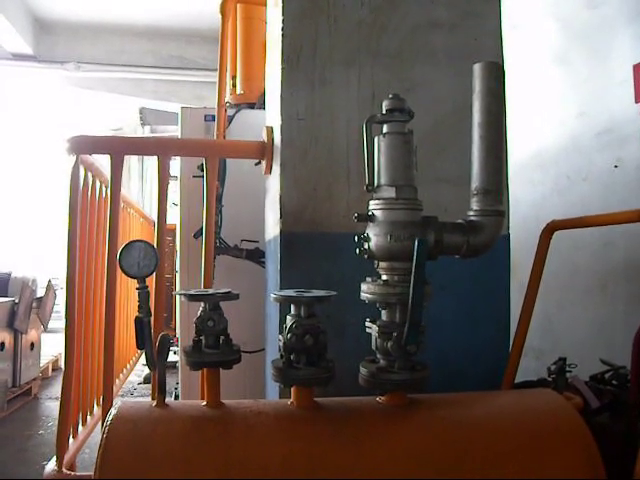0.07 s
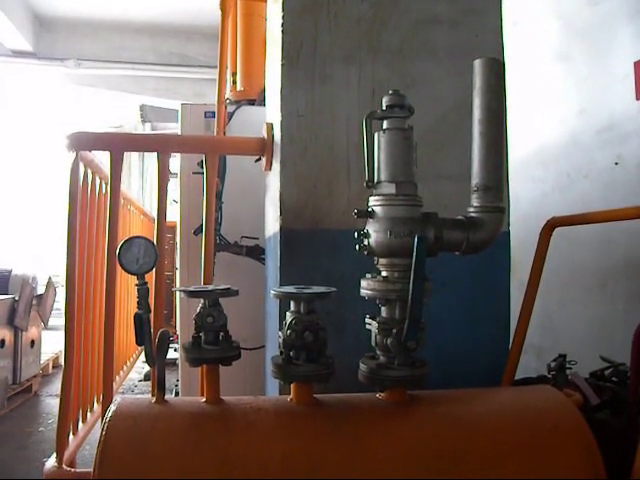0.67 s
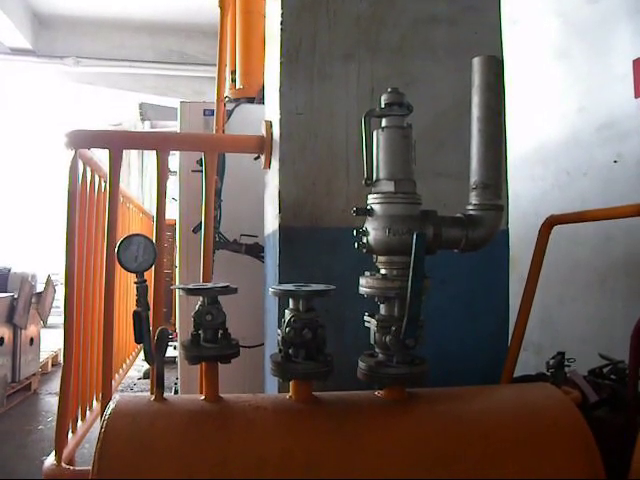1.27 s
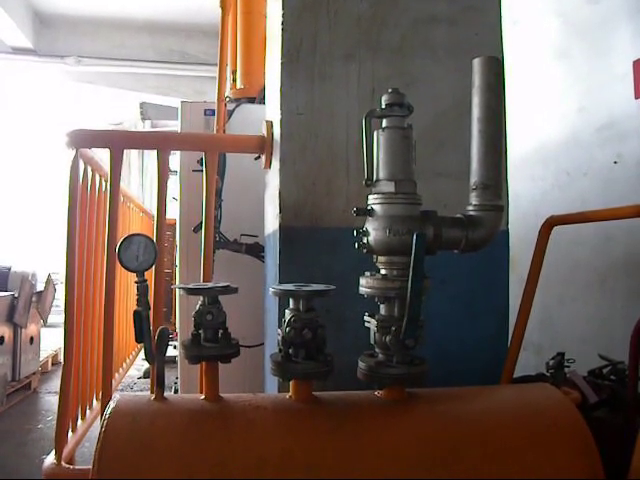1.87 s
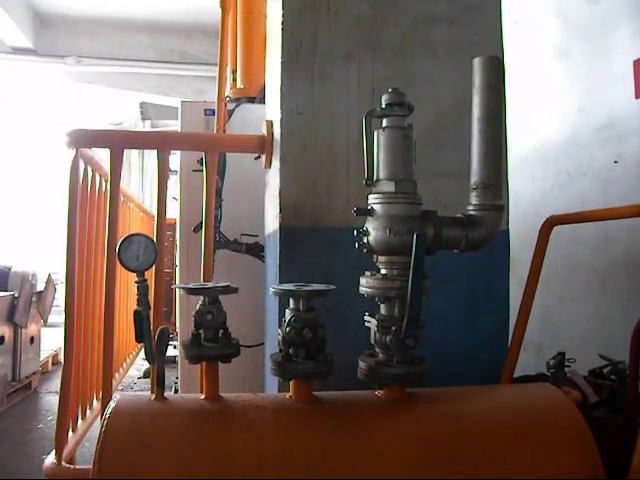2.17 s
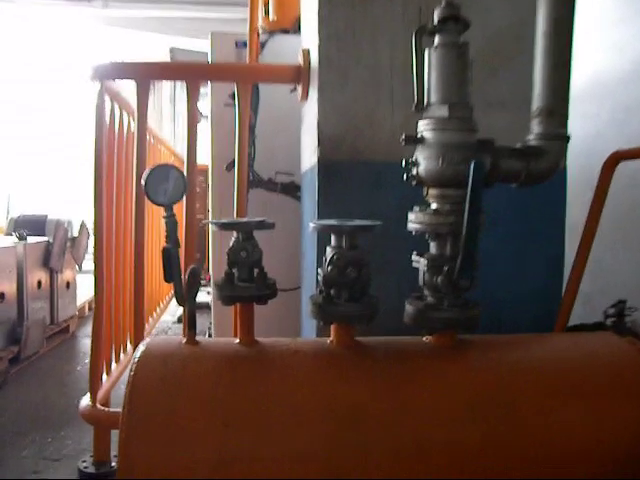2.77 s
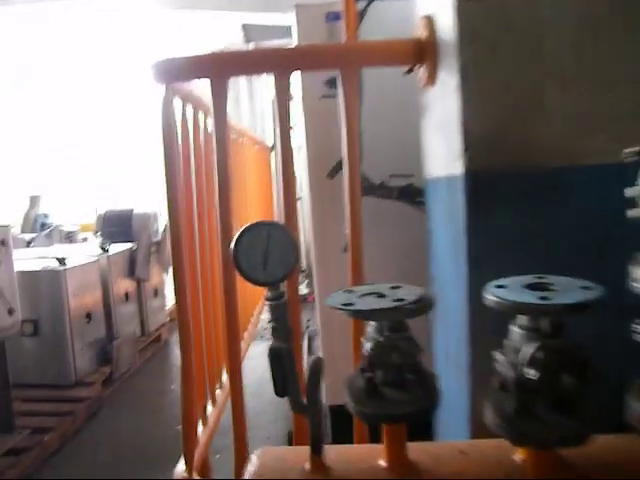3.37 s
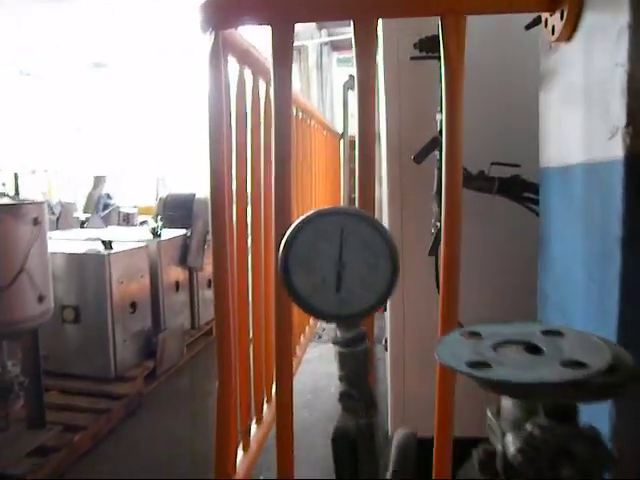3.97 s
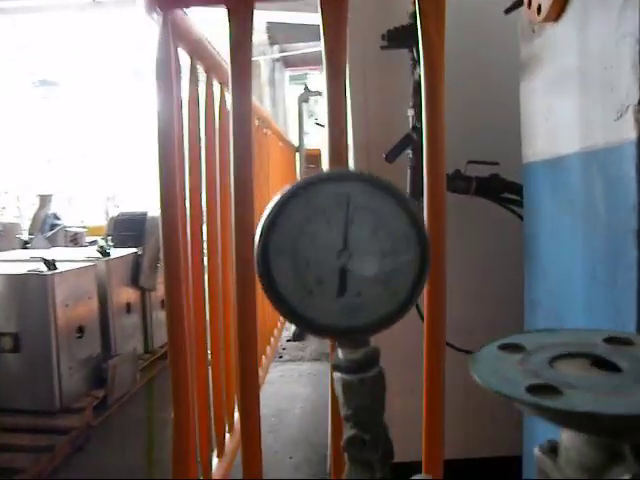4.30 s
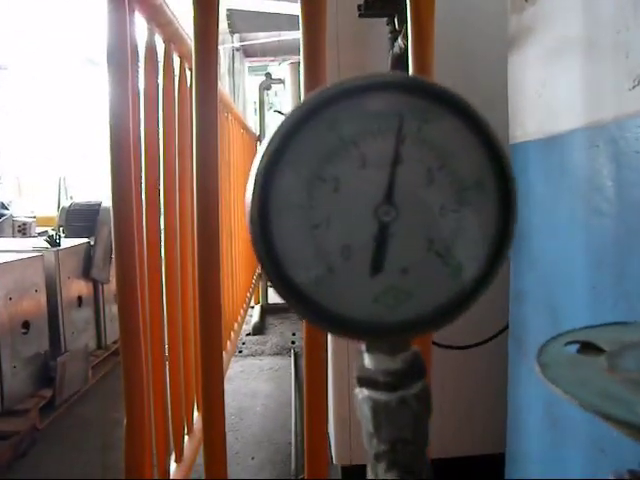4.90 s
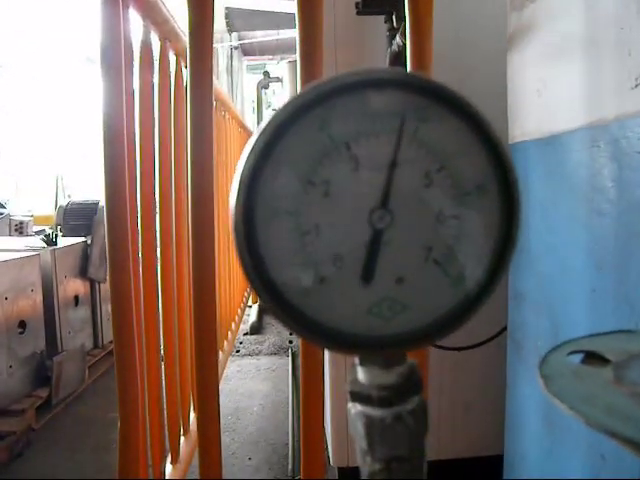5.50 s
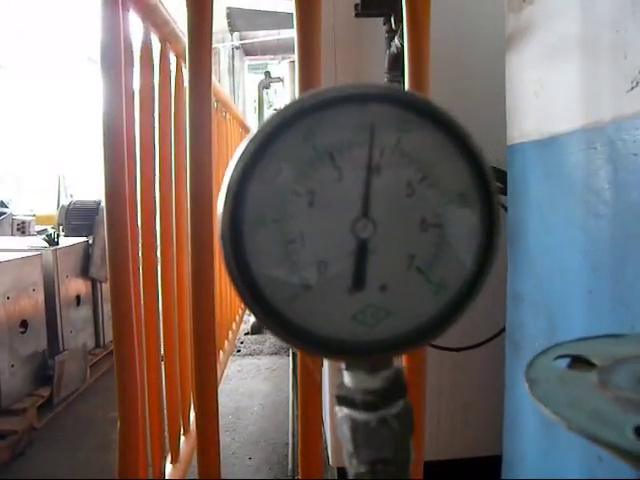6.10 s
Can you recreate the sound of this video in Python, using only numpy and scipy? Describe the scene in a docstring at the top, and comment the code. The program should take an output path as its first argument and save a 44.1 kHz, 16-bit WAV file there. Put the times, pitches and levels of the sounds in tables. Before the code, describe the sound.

A fading air blast gives way to the steady singing hiss of compressed air in factory pipes. Three times a valve clanks open and vents a jet of air that dies away over a low exhaust drone. Machines hum faintly behind, and the pipe notes shift midway as the microphone moves. The small camera microphone has a telephone-like tone, dips in volume at each bang and adds a few tiny clicks.

```python
"""Compressed air sings through steel pipes in a factory hall, over faint machine tones and rumble.
About every two seconds a valve knocks, bangs open and blows off air through a droning exhaust pipe.
The pipe notes shift when the valve first switches over, and later as a small camera's microphone
moves from the tank to the pressure gauge. The camera sounds like a telephone, adds faint hiss
and ticks, and turns itself down at each loud bang."""
import sys
import numpy as np
from scipy import signal
from scipy.fft import rfft, irfft, next_fast_len
from scipy.io import wavfile
from scipy.ndimage import uniform_filter1d, map_coordinates

SR = 44100
rng = np.random.default_rng(int(sys.argv[2]) if len(sys.argv) > 2 else 0)


def store_pcm(level_fs):
    """Save levels as 16-bit WAV."""
    pcm = np.round(np.clip(level_fs, -1, 1) * 32767).astype(np.int16)
    wavfile.write(sys.argv[1], SR, np.atleast_2d(pcm).T)


N = 275625
BAND_HZ = 4080  # the microphone loses sound above this

# Which pipe sound is heard; in-between values mix two:
# (time [s], stage [0 tank, 1 tank after the valve switches over, 2 handwheels, 3 gauge])
STAGES = [(1.7, 0.5), (2.2, 0.75), (3.2, 1), (3.55, 2), (3.9, 2), (4.55, 3)]
# Blow-offs: (time [s], jet level [dB], drone level [dB], drone rise [s], ring pitch [Hz], ring level [dB])
BLOW_OFFS = [(-.4, -12, -27.5, 0.8, 440, -23), (1.69, -9.5, -27.5, 0.39, 445, -24.5),
             (3.789, -8, -23.5, .03, 383, -29.5), (5.86, -14, -27, 0.019, 388, -26.5)]


def amp(db):
    """Turn decibels into a multiplier."""
    return 10 ** (np.asarray(db) / 20)


def unit(x):
    """Scale x to an average (rms) level of 1."""
    return x / np.sqrt(np.mean(x ** 2) + 1e-20)


def clock():
    """The time of each sample in seconds."""
    return np.arange(N) / SR


def curve(rows):
    """Join (time, value) rows with straight lines."""
    return np.interp(clock(), *np.transpose(rows))


def colour(points, hz):
    """The multiplier at hz, read between (Hz, dB) points."""
    point_hz, db = np.transpose(points)
    return amp(np.interp(np.log(hz + 1), np.log(point_hz + 1), db))


def filtered(x, response):
    """Multiply each frequency in x by response(hz)."""
    size = next_fast_len(len(x) + 8192, real=True)
    return irfft(rfft(x, size) * response(np.fft.rfftfreq(size, 1 / SR)), size)[:len(x)]


def noise(response, size=N):
    """Fresh noise shaped by response, at level 1."""
    return unit(filtered(rng.standard_normal(size), response))


def resonance(hz, centre_hz, width_hz):
    """A peak that favours frequencies near centre_hz."""
    return 1 / (1 + ((hz - centre_hz) / width_hz) ** 2)


def wobble(rate):
    """A smooth curve through rate random values a second."""
    knots = rng.standard_normal(int(N * rate / SR) + 4)
    steps = np.arange(0, len(knots), 1 / 10)
    return np.interp(clock() * rate, steps, map_coordinates(knots, [steps]))


def swell(age, rise_s, fade_db_per_s):
    """A loudness shape that rises from silence and fades."""
    age = np.maximum(age, 0)
    return np.sin(np.pi / 2 * np.minimum(age / rise_s, 1)) ** 2 * amp(-fade_db_per_s * age)


def pipe(modes, rush_shape, width_hz, ring_db, rush_db):
    """Swirling air makes a pipe ring at its own notes (modes) over a broad rush."""
    grid = np.arange(2 * BAND_HZ)
    widths = [width_hz * np.sqrt(hz / BAND_HZ) for hz, db in modes]
    power = sum((amp(db) * resonance(grid, hz, w)) ** 2 / w for (hz, db), w in zip(modes, widths))
    ring = noise(lambda hz: np.interp(hz, grid, np.sqrt(power), right=0))
    steadiness = 0.57  # the supply pressure evens out the ringing: 0 free, 1 constant
    ring_power = np.abs(uniform_filter1d(ring ** 2, size=1500))
    ring = unit(ring / ring_power ** (steadiness / 2))
    ripple_hz, ripple_db = 14, 2.5  # many weaker notes ripple the rush: spacing, depth
    ripple = amp(ripple_db * rng.standard_normal(len(grid)))
    rush = noise(lambda hz: colour(rush_shape, hz) * np.interp(hz, grid * ripple_hz, ripple))
    return amp(ring_db) * ring + amp(rush_db) * rush


def singing_pipes():
    """Flowing air sings; its notes change as the valve switches over, then as the microphone moves."""
    # Pipe notes that stand out at each stage: (pitch [Hz], relative level [dB])
    tank_modes = [(1125, -46), (1180, -49), (1250, -48), (1297, -41.5), (1351, -45), (1389, -38.5),
                  (1433, -41), (1567, -43.5), (1690, -43), (1787, -46.5), (1890, -46.5), (1930, -44.5),
                  (2019, -39), (2094, -42), (2137, -44.5), (2196, -46), (2220, -32), (2244, -29),
                  (2297, -35.5), (2351, -30.5), (2420, -34), (2466, -42), (2488, -28.5), (2560, -37.5),
                  (2616, -38), (2662, -35.5), (2738, -35.5), (2762, -41), (2887, -36), (3074, -37),
                  (3112, -33), (3143, -28.5), (3195, -43), (3236, -31), (3272, -31), (3348, -42.5),
                  (3435, -38.5), (3488, -41), (3555, -38), (3714, -39)]
    after_switch_modes = [(1174, -45), (1346, -50.5), (1384, -42), (1432, -42), (1782, -43), (1960, -41),
                          (2013, -48), (2078, -52.5), (2196, -29), (2293, -30.5), (2406, -28.5),
                          (2476, -36.5), (2552, -41), (2616, -44), (2654, -35), (2751, -44.5),
                          (2885, -38.5), (3004, -33.5), (3138, -28), (3252, -33.5), (3305, -30.5),
                          (3348, -41), (3386, -42), (3440, -35.5), (3553, -39), (3639, -39.5),
                          (3698, -38.5), (3758, -50)]  # at the tank after the valve switches over
    wheel_modes = [(1174, -41), (1384, -46.5), (1707, -40.5), (1890, -37.5), (1970, -53), (2013, -31),
                   (2083, -38), (2148, -38.5), (2196, -29), (2347, -33), (2439, -37), (2606, -46.5),
                   (2762, -27), (3138, -32), (3198, -24.5), (3451, -39)]
    gauge_modes = [(1071, -43), (1163, -39.5), (1244, -51.5), (1283, -43.5), (1324, -42.5), (1360, -45),
                   (1440, -42.5), (1545, -39.5), (1604, -39.5), (1660, -39.5), (1943, -36.5), (2007, -32),
                   (2076, -36.5), (2152, -32), (2195, -31.5), (2223, -26), (2252, -29.5), (2293, -35),
                   (2350, -31.5), (2400, -27), (2469, -33), (2530, -32.5), (2643, -35), (2705, -37),
                   (2765, -46.5), (2859, -34), (2893, -42), (3042, -33.5), (3068, -31), (3105, -35),
                   (3162, -33.5), (3219, -31), (3255, -29.5), (3354, -42), (3440, -37), (3480, -36.5),
                   (3628, -40.5), (3688, -36)]
    # The rush of air between the notes: (frequency [Hz], relative level [dB])
    tank_rush = [(59, -79), (100, -42.5), (200, -18), (311, -15.5), (417, -19), (620, -17), (1000, -20),
                 (1400, -10.5), (1880, -12), (2290, 1.5), (2650, -10.5), (2970, -1), (3170, 1.5),
                 (3400, -7.5), (3920, -11), (5100, -40), (8620, -120)]
    wheel_rush = [(59, -77), (100, -39), (250, -21.5), (620, -18.5), (1000, -15.5), (1880, -10),
                  (2290, 0.5), (2750, -6.5), (3200, 1.5), (3920, -12.5), (5100, -35), (8620, -120)]
    gauge_rush = [(59, -64), (100, -28), (300, -16), (450, -15.5), (832, -22.5), (898, -11.5), (985, -16.5),
                  (1610, -7), (1790, -14), (2260, 1), (3160, -3.5), (3920, -11.5), (5100, -46),
                  (8620, -120)]
    sounds = [pipe(tank_modes, tank_rush, width_hz=7.4, ring_db=-2.5, rush_db=-7.5),
              pipe(after_switch_modes, tank_rush, width_hz=9.9, ring_db=-4.5, rush_db=-7.5),
              pipe(wheel_modes, wheel_rush, width_hz=7.2, ring_db=-6, rush_db=-5.5),
              pipe(gauge_modes, gauge_rush, width_hz=9.0, ring_db=-2.5, rush_db=-6.0)]
    t, stage = clock(), np.clip(curve(STAGES), 0, 3)
    heard = sum(np.sqrt(np.maximum(1 - np.abs(stage - k), 0)) * sound for k, sound in enumerate(sounds))
    # The valve chokes the flow quickly just before each jet, then reopens gently.
    lead_s, shut_s, hold_s, reopen_s = 0.056, 0.012, 0.48, 0.099
    choke = sum(np.tanh((t - start + lead_s) / shut_s) - np.tanh((t - start - hold_s) / reopen_s)
                for start, *_ in BLOW_OFFS) / 2
    flow_db, dip_db = -15, 5.5
    flutter_db = 0.45 * wobble(130) + 0.54 * wobble(450)  # swirling air is never quite even
    return amp(flow_db - dip_db * choke + flutter_db) * heard


def machine_tones():
    """Machines hum on slightly wavering notes whose strength depends on the place in the hall."""
    # Machine notes: (pitch [Hz], level at the tank [dB], level at the gauge [dB])
    tones = [(312, -53, -66), (374, -53, -72), (392, -55, -41), (452, -46.5, -66.5), (529, -48, -62),
             (693, -51.5, -53), (917, -51.5, -42.5)]
    gauge_share = np.clip(curve(STAGES) / 3, 0, 1) ** 2
    out = np.zeros(N)
    for hz, tank_db, gauge_db in tones:
        level_db = tank_db + gauge_share * (gauge_db - tank_db) + wobble(6)
        pitch_hz = hz + 1.384 * wobble(10)
        out += amp(level_db) * unit(np.sin(2 * np.pi * np.cumsum(pitch_hz) / SR))
    return out


def rumble():
    """The air plant rumbles, low and faint."""
    return amp(-56) * noise(lambda hz: resonance(hz, centre_hz=90, width_hz=38) * hz / (hz + 60))


def blow_off():
    """Each air jet sounds the exhaust pipe's drone and a higher ring, fading as its pressure falls."""
    # The jet's hiss: (frequency [Hz], relative level [dB])
    jet_shape = [(100, -45), (170, -11), (284, -11.5), (394, -6), (554, -9), (616, -1.5), (1040, -9.5),
                 (1250, -6.5), (1610, -6.5), (1740, -5), (2320, -5.5), (3100, 1.5), (3530, 1),
                 (3920, -12.5), (5100, -31), (8620, -120)]
    jet_rise_s, fade_db_per_s = 0.07, 23.5
    drone_hz, drone_lead_s = 131.2, 0.041  # the bang starts the drone just before the jet
    jet = noise(lambda hz: colour(jet_shape, hz)) * amp(wobble(60))
    pitch_hz = drone_hz + 2.8 * wobble(16)
    note = np.sin(2 * np.pi * np.cumsum(pitch_hz) / SR) * amp(3.1 * wobble(16))
    breath = noise(lambda hz: resonance(hz, drone_hz, width_hz=17))
    drone = unit(unit(note) + 0.5 * breath)
    out = np.zeros(N)
    for start, jet_db, drone_db, drone_rise_s, ring_hz, ring_db in BLOW_OFFS:
        age = clock() - start
        ring = noise(lambda hz: resonance(hz, ring_hz, width_hz=17))
        out += swell(age, jet_rise_s, fade_db_per_s) * (amp(jet_db) * jet + amp(ring_db) * ring)
        out += swell(age + drone_lead_s, drone_rise_s, fade_db_per_s) * amp(drone_db) * drone
    return out


def amplifier_hiss():
    """The microphone's amplifier adds a faint, steady hiss."""
    # Amplifier noise: (frequency [Hz], relative level [dB])
    hiss_shape = [(15, 18), (70, -10), (4000, -26), (5000, -12.5), (5700, 1), (7000, 4), (9000, 3),
                  (12800, 0.4)]
    return amp(-51.5) * noise(lambda hz: colour(hiss_shape, hz))


def electrical_ticks():
    """The electronics make tiny sharp clicks, each with a soft low bump."""
    # Ticks: (time [s], click level [dB], bump level [dB])
    ticks = [(1.1537, -5.5, -46), (2.152, -45, -40), (4.148, -45, -43), (5.1452, -16, -58),
             (6.1431, -9.5, -41)]
    t, out = clock(), np.zeros(N)
    for when, click_db, bump_db in ticks:
        out += amp(bump_db) * np.exp(-((t - when) / 0.0061) ** 2)
        out[round(when * SR)] += amp(click_db)
    return out


def valve_knocks():
    """Each knock is a burst of air, a short thud or clink, and the ring of the valve's body."""
    # Knocks and bangs: (time [s], burst level [dB], thud level [dB], thud pitch [Hz],
    # ring level [dB], time for the burst to fade 60 dB [s])
    knocks = [(1.584, -14.5, -16, 3260, -30, .08), (1.595, -14, -7, 3200, -28, .05),
              (1.601, -15, -12, 550, -19, 0.055), (1.602, -16, -9, 1145, -11, 0.066),
              (1.608, -7, -8, 1710, -15, 0.12), (1.615, -4, -4, 3480, -17, 0.056),
              (1.630, -3.5, -9.5, 414, -2.5, 0.36), (1.634, -1, -9.5, 219, -6, 0.1),
              (3.69, -12, -15, 2830, -25, .04), (3.696, -20, -9.5, 607, -5, 0.073),
              (3.696, -9, -8, 2040, -12, 0.37), (3.727, -0.5, -5.5, 450, -9, 0.07),
              (3.730, -9, -3, 1036, -16, 0.052), (3.737, 3, -1.5, 660, -5, 0.029),
              (3.737, -3, -0.5, 3150, -12, 0.28), (3.749, -12, -14, 150, -8, 0.21),
              (4.219, -41, -26, 280, -8.5, 0.17), (4.285, -20, -22, 330, -10.5, 0.27),
              (5.742, -16, -18.5, 410, -9, 0.12), (5.748, -6, -10.5, 775, -19, 0.22),
              (5.753, -9.5, -15, 3400, -14, 0.35), (5.782, -1, -6, 3236, -17, 0.062),
              (5.791, -17, -13, 400, -13, 0.09), (5.804, -12.5, -13.5, 190, -6, 0.51)]
    # The burst of air: (frequency [Hz], relative level [dB])
    burst_shape = [(150, -24), (500, -5.5), (1100, -5.5), (1900, -5.5), (2600, -3), (3450, 2.5), (3950, -8),
                   (5100, -34), (8620, -120)]
    # The body's notes: (pitch [Hz], relative level [dB], time to fade 60 dB [s])
    body_modes = [(245, -11.5, 0.18), (479, -7.5, 0.2), (553, -21, 0.08), (590, -11.5, 0.5),
                  (600, -5, 0.045), (805, -9, 0.058), (1040, -13, 0.05), (1116, -7, 0.087),
                  (1960, -5, 0.046)]
    out, age = np.zeros(N + SR), np.arange(SR // 2) / SR
    punch = swell(age, rise_s=0.0031, fade_db_per_s=905)
    punch = punch / punch.max()
    for start, burst_db, thud_db, thud_hz, ring_db, burst_s in knocks:
        burst = noise(lambda hz: colour(burst_shape, hz), size=len(age))
        burst *= swell(age, rise_s=0.0027, fade_db_per_s=60 / burst_s)
        grit = noise(lambda hz: resonance(hz, thud_hz, width_hz=0.65 * thud_hz), size=len(age))
        thud = punch * (np.sin(2 * np.pi * thud_hz * age) + 0.1 * grit)
        # A thud favours the body notes near its own pitch.
        ring = sum(amp(db - 60 * age / fade_s) * resonance(hz, thud_hz, width_hz=260)
                   * np.sin(2 * np.pi * hz * age) for hz, db, fade_s in body_modes)
        ring *= 1 - np.exp(-age / 0.0085)
        knock = amp(burst_db) * burst + amp(thud_db) * thud + amp(ring_db) * ring
        out[round(start * SR):][:len(age)] += knock
    return out[:N]


def scene():
    """All the sounds of the hall at one microphone."""
    return (singing_pipes() + blow_off() + valve_knocks() + machine_tones() + rumble())[None]


def gain_control(x, limit_db, release_db_per_s, attack_s):
    """The volume drops quickly when the sound passes the limit, then creeps back."""
    power = np.abs(uniform_filter1d(x ** 2, size=400))
    excess_db = np.maximum(10 * np.log10(power + 1e-12) - limit_db, 0)
    ramp = release_db_per_s * clock()
    cut_db = np.maximum.accumulate(excess_db + ramp) - ramp
    smoothing = np.exp(-1 / (attack_s * SR))
    return x * amp(-signal.lfilter([1 - smoothing], [1, -smoothing], cut_db))


def record(dry):
    """The camera turns down bangs, rounds off peaks, cuts deep bass and treble, and adds its own noise."""
    bass_hz, top_hz = 70, 12850
    held = gain_control(dry[0], limit_db=-15.5, release_db_per_s=31, attack_s=0.011)
    rounded = held / (1 + (held / 0.9) ** 8) ** (1 / 8)
    narrow = filtered(rounded, lambda hz: hz ** 4 / (hz ** 4 + bass_hz ** 4)
                      / np.sqrt(1 + (hz / BAND_HZ) ** 120))
    return filtered(narrow + amplifier_hiss() + electrical_ticks(), lambda hz: hz < top_hz)[None]


dry = scene()
out = record(dry)
store_pcm(out)
```